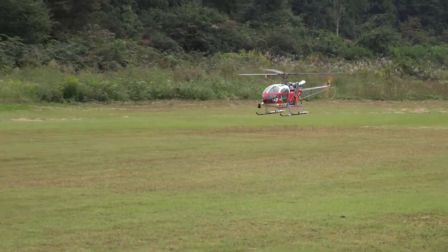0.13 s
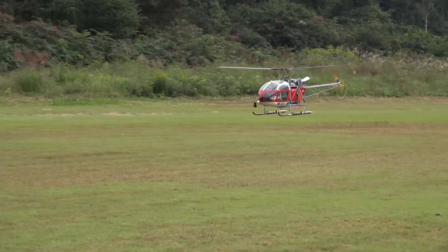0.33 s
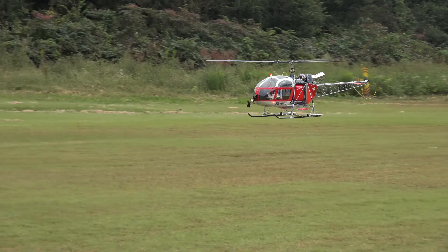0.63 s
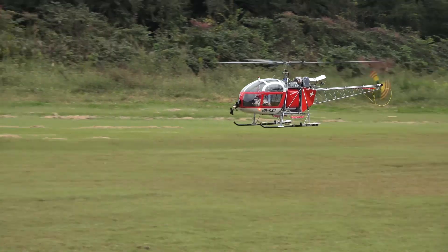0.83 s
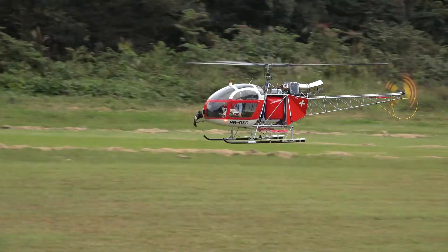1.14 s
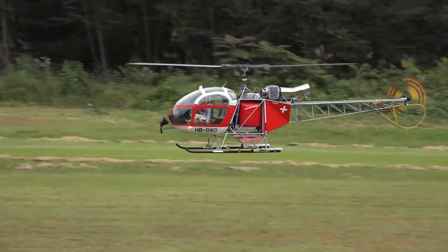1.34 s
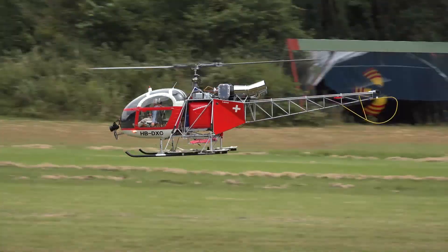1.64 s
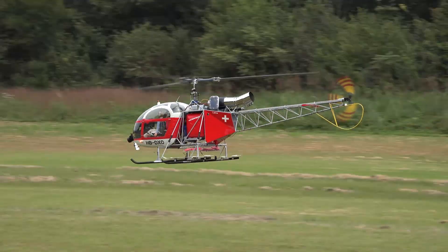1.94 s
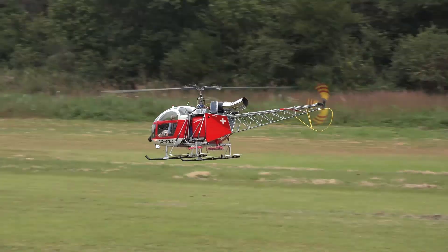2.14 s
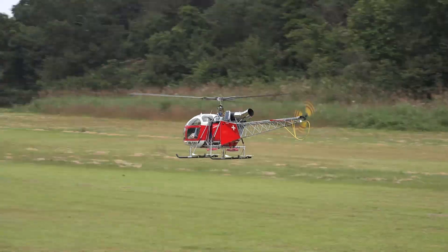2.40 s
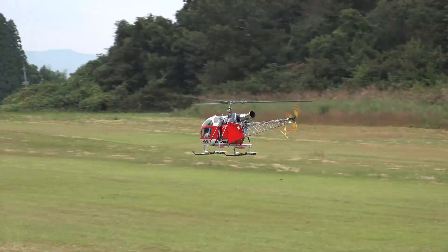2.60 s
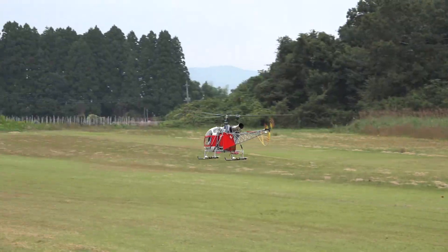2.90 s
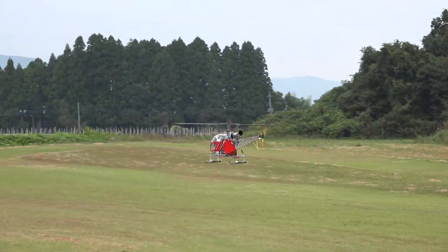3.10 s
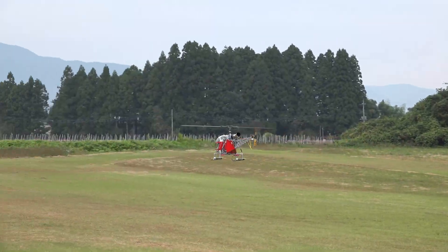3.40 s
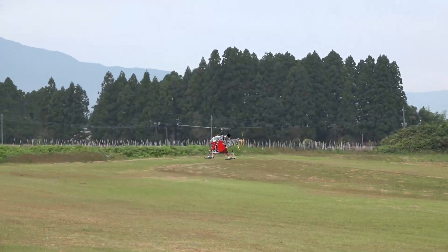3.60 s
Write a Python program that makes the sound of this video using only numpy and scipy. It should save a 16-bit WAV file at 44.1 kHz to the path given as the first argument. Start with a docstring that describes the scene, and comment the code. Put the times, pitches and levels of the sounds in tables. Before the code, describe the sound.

A large model helicopter with a small turbine passes low over an open grass field, shrill whine and hissing jet rush sliding down in pitch, then dulling into roar; outdoor microphone beside the flight path.

```python
"""Over a grass field, a large model helicopter with a small turbine flies low past the microphone.
Compressor whine and rotor, shaft and gear tones are sinusoids that sink in pitch on one Doppler clock.
Shaped noise makes wash, roar, jet rush, hiss and fizz; the treble weakens late, as the wash gains on it.
The grass reflection sweeps a comb through rush and tones, and the blades chop the hiss most when near.
A faint breeze rumbles beneath as low-passed noise."""
import sys
import numpy as np
from scipy import signal
from scipy.io import wavfile
from scipy.ndimage import uniform_filter1d

SR = 44100
rng = np.random.default_rng(int(sys.argv[2]) if len(sys.argv) > 2 else 0)


def put_to_file(sound):
    """Save the sound as 16-bit audio at rate SR, in the file named by the first command-line argument."""
    columns = np.atleast_2d(sound).T  # one column per channel
    safe = np.clip(columns, -1, 1)
    whole_steps = np.round(safe * 32767)
    wavfile.write(sys.argv[1], SR, whole_steps.astype(np.int16))


N = 165375
TIME = np.arange(N) / SR
HOP = 256  # samples between steps of the slow curves


def amp(db):
    """Logarithmic level: decibels to linear amplitude."""
    return 10 ** (np.asarray(db) / 20)


def unit(x):
    """Normalization: scales a signal to rms 1."""
    return x / np.sqrt(np.mean(abs(x) ** 2) + 1e-20)


def curve(table, t, axis=1):
    """Linear interpolation of one column against time."""
    rows = np.array(table)
    return np.interp(t, rows[:, 0], rows[:, axis])


def spectrum(table, hz, axis=1):
    """Interpolation of one column against logarithmic frequency."""
    rows = np.array(table)
    return np.interp(np.log(hz + 1), np.log(rows[:, 0]), rows[:, axis])


def drift(hz):
    """Low-passed complex Gaussian noise of rms 1, its amplitude halved at hz."""
    f = np.fft.fftfreq(N, 1 / SR)
    white = rng.standard_normal(N) + 1j * rng.standard_normal(N)
    return unit(np.fft.ifft(white / (1 + (f / hz) ** 2)))


# closest moment, and how long the sound takes to turn before and after it (s)
ABEAM_S, APPROACH_S, LEAVE_S = 1.73, 1.53, 1.56


def aspect(t):
    """Source directivity: shares of front, side and rear that face the listener, summing to 1."""
    front = np.clip((ABEAM_S - t) / APPROACH_S, 0, 1)
    rear = np.clip((t - ABEAM_S) / LEAVE_S, 0, 1)
    return np.array([front, 1 - front - rear, rear])


# compressor whine as heard, with its Doppler fall: time_s, pitch_hz
WHINE_HZ = [(0, 10274), (.5, 10269), (.8, 10240), (1.02, 10218), (1.25, 10155), (1.49, 10055), (1.72, 9925),
            (1.96, 9778), (2.15, 9695), (2.4, 9615), (2.7, 9555), (3.0, 9526), (3.4, 9492), (3.75, 9460)]
REFERENCE_HZ = 10000  # whine pitch at which the machine's other pitches are stated


def doppler_clock():
    """Doppler effect: source time as heard, advancing one second per REFERENCE_HZ whine cycles."""
    pitch_hz = uniform_filter1d(curve(WHINE_HZ, TIME), size=4000, mode="nearest")
    return np.cumsum(pitch_hz) / REFERENCE_HZ / SR


# lag of the ground reflection behind the direct sound: time_s, lag_ms
GROUND_LAG = [(0, 0.47), (.3, 0.52), (.55, 0.6), (.8, 0.75), (1.3, 1.014), (1.55, 1.22), (1.75, 1.23),
              (1.95, 1.241), (2.15, 1.13), (2.4, 0.924), (2.65, 0.76), (2.95, 0.64), (3.35, 0.58),
              (3.75, 0.51)]
# how the turf reflects: frequency_hz, phase_lag_turns (added, at TURF_LAG_MS), comb_depth (0-1)
TURF = [(201, 0, 1), (457, 0.11, 0.89), (960, 0.081, 0.75), (2270, 0.2, 0.8), (4580, 0.17, 0.65),
        (9000, 0.017, 0.28)]
TURF_LAG_MS = 0.87  # the phase lag grows as the angle gets more grazing
# factor on comb_depth: approaching, abeam, leaving
COMB_BY_ASPECT = [1.09, 1, 0.93]


def ground(hz, t):
    """Two-path interference: gain of the direct sound plus its reflection from soft turf."""
    lag_ms = curve(GROUND_LAG, t)
    path_turns = hz * lag_ms / 1000
    turf_turns = spectrum(TURF, hz) * TURF_LAG_MS / lag_ms
    depth = spectrum(TURF, hz, axis=2) * np.tensordot(COMB_BY_ASPECT, aspect(t), 1)
    return np.sqrt(1 + np.clip(depth, 0, .95) * np.cos(2 * np.pi * (path_turns + turf_turns)))


# spectral shape of the rush before ground and band levels:
# frequency_hz, approaching_db, abeam_db, leaving_db
RUSH = [(20, -24, -47, -15), (70, -31, -23, -26), (109, -17, -18, -14), (170, -18.2, -8.5, -9.5),
        (256, -17.0, -6, -9.5), (356, -15, -10.5, -9.0), (472, -23, -1.5, -12.6), (592, -7.5, -5, -10),
        (790, -9.5, -11.5, -5.0), (1060, -10, -9, -6.5), (1236, -7.5, -2, -3), (1500, -18.2, -8, -11),
        (1980, -16.5, -4.5, -13), (2470, -20, -10.5, -15.5), (3340, -16, -9, -16.5),
        (5000, -14, -7.5, -17.5), (6400, -14.5, -9.5, -16), (8150, -9, -9.5, -16), (8850, -12, -12.5, -17),
        (10900, -12, -13.1, -20.5), (12900, -16.5, -16.5, -20.5), (15500, -23.4, -21.6, -29.5)]
# nominal band levels before trim: time_s, rotor_wash_db, exhaust_roar_db, jet_rush_db, hiss_db, fizz_db
LEVELS = [(0.0, -40, -23, -25, -20.5, -21), (0.13, -34.5, -24.5, -23.5, -20, -23),
          (0.52, -33.5, -22.5, -26, -19, -23.5), (0.65, -32, -21.5, -24, -18.5, -27),
          (0.71, -31, -23, -25.5, -19.5, -25), (0.75, -39, -19, -22, -17.5, -24),
          (0.81, -31, -24.5, -19.5, -19, -20), (0.83, -33, -21.5, -22.5, -17, -21.5),
          (1.12, -32, -20.5, -24, -20.5, -23), (1.14, -30, -20.5, -22, -18, -23.5),
          (1.68, -29.5, -16.5, -20.5, -20, -23.5), (2.05, -32, -17, -18.5, -15.5, -24.5),
          (2.26, -30.5, -20.5, -17.5, -16, -26), (2.32, -28.5, -20.5, -15.5, -17, -25.5),
          (2.5, -29, -18, -18.5, -19, -27.5), (2.91, -26, -17.5, -22.5, -21, -28),
          (2.97, -29, -15.5, -23, -19.5, -27), (3.08, -27, -20.5, -24.5, -22, -31),
          (3.68, -30, -19, -27, -25, -34.5), (3.75, -27, -21, -23, -28, -36)]
# band edges in the order of LEVELS: low_hz, high_hz
BANDS_HZ = [(100, 400), (400, 1600), (1600, 4500), (4500, 9000), (11000, 15500)]
# trim added to each band level: trim_db
BAND_TRIM_DB = [-0.61, -0.57, -0.56, -0.57, -0.077]


def rush_shape(hz, t):
    """Directivity and interference: noise spectrum over time, with each band brought to its level."""
    by_side = np.array([spectrum(RUSH, hz, axis=k + 1) for k in range(3)])
    shape = amp(aspect(t).T @ by_side) * ground(hz, t[:, None])
    gains = []
    for k, (lo, hi) in enumerate(BANDS_HZ):
        power = (shape[:, (hz > lo) & (hz < hi)] ** 2).sum(1)
        gains.append(curve(LEVELS, t, axis=k + 1) + BAND_TRIM_DB[k] - 10 * np.log10(power))
    centers = np.log(BANDS_HZ).mean(1)
    return shape * amp([np.interp(np.log(hz + 1), centers, g) for g in np.array(gains).T])


# stereo spread of the rush: frequency_hz, side_minus_mid_db
WIDTH = [(20, 8), (60, -32), (130, -74), (1000, -85), (2500, -75.5), (5000, -35.5), (9000, -12.5),
         (14000, -21)]
PATCH_DB, SWELL_DB = 1.0, 0.25  # rms unevenness over time and frequency, and over time alone
BLADE_HZ = 43.5  # chop rate at REFERENCE_HZ
CHOP_NEAR, CHOP_FAR = 0.28, .06  # depth added near the pass, and depth always present
CHOP_S, CHOP_WIDTH_S, CHOP_ABOVE_HZ = 1.6, 0.63, 9900


def rush(clock):
    """Turbulence noise with amplitude modulation: combed by the ground, treble chopped by the blades."""
    hz = np.fft.rfftfreq(1024, 1 / SR)
    t = np.arange(N // HOP + 5) * HOP / SR
    shape = rush_shape(hz, t)
    patches = uniform_filter1d(rng.standard_normal(shape.shape), size=12, axis=0)
    patches = unit(uniform_filter1d(patches, size=16, axis=1))
    swell = unit(uniform_filter1d(rng.standard_normal(len(t)), size=8))[:, None]
    mid_side = (2,) + shape.shape
    noise = rng.standard_normal(mid_side) + 1j * rng.standard_normal(mid_side)
    noise = noise * shape * amp(PATCH_DB * patches + SWELL_DB * swell)
    noise = noise * np.array([np.ones(len(hz)), amp(spectrum(WIDTH, hz))])[:, None]

    def sound(part):
        """Fourier synthesis: overlap-adds the noise frames."""
        wave = signal.istft(part, nperseg=1024, noverlap=768, time_axis=1, freq_axis=2)[1]
        return wave[:, :N] * np.sqrt(1.5)

    treble = 1 - 1 / (1 + (hz / CHOP_ABOVE_HZ) ** 4)
    low, high = sound(noise * (1 - treble)), sound(noise * treble)
    depth = CHOP_FAR + CHOP_NEAR * np.exp(-((TIME - CHOP_S) / CHOP_WIDTH_S) ** 2)
    return low + high * (1 + depth * np.cos(2 * np.pi * BLADE_HZ * clock))


# whine fading in and out on its way: time_s, level_db (before WHINE_GAIN_DB)
WHINE_DB = [(0, -11), (.55, -12), (.58, -15), (.87, -15.5), (1.11, -11), (1.19, -17), (1.24, -13),
            (1.35, -15.5), (1.38, -17), (1.43, -13.5), (1.67, -19), (1.71, -14.5), (1.97, -21.5),
            (2.02, -29), (2.06, -19), (2.125, -29), (2.17, -18), (2.36, -24), (2.42, -16.5), (2.49, -16),
            (2.6, -21.5), (2.74, -19.5), (2.8, -26.5), (2.88, -15.5), (2.96, -17.5), (3.21, -34),
            (3.27, -27), (3.39, -25), (3.46, -34), (3.52, -28.5), (3.63, -24), (3.75, -27.5)]
WHINE_GAIN_DB, WHINE_SIDE_DB = -1, -21  # overall gain; side relative to mid
FLUTTER_EARLY, FLUTTER_LATE, FLUTTER_HZ = 0.1, 0.18, 22  # rms share of the tone, and noise cutoff
SKIRT_DB, SKIRT_HZ = -15, 160  # fuzz round the whine, relative to the tone


def whine(clock):
    """Blade-passing tone with random modulation, fluttering more as it crosses the rotor wake."""
    front = aspect(TIME)[0]
    flutter = FLUTTER_EARLY * front + FLUTTER_LATE * (1 - front)
    modulation = 1 + flutter * drift(FLUTTER_HZ) + amp(SKIRT_DB) * drift(SKIRT_HZ)
    tone = modulation * np.exp(2j * np.pi * REFERENCE_HZ * clock)
    tone = np.sqrt(2) * tone * amp(curve(WHINE_DB, TIME) + WHINE_GAIN_DB)
    return np.array([tone.real, amp(WHINE_SIDE_DB) * tone.imag])  # mid, side


TONE_WAVER, ROTOR_WAVER, TONE_WAVER_HZ = 0.52, .15, 7.1  # rms shares of a tone, and noise cutoff


def tones(table, waver, clock):
    """Additive synthesis: wavering sinusoids, each rising and falling in the ground comb."""
    out, facing, t = np.zeros(N), aspect(TIME).T, TIME[::HOP]
    for hz, *db in table:
        heard_hz = hz * curve(WHINE_HZ, t) / REFERENCE_HZ
        comb = np.interp(TIME, t, unit(ground(heard_hz, t)))
        tone = unit(1 + waver * drift(TONE_WAVER_HZ)) * np.exp(2j * np.pi * hz * clock)
        out += np.sqrt(2) * amp(facing @ np.array(db)) * comb * tone.real
    return out


# rotor tones at REFERENCE_HZ, before the comb: pitch_hz, approaching_db, abeam_db, leaving_db
ROTOR_TONES = [(43.5, -51, -47, -54), (59.5, -56, -47, -51), (87, -50, -46, -44), (181, -38, -37, -40)]


def rotor_tones(clock):
    """Periodic blade loading: low tones of the rotors, with slight waver."""
    return tones(ROTOR_TONES, ROTOR_WAVER, clock)


# turbine shaft tones at REFERENCE_HZ, before the comb: pitch_hz, approaching_db, abeam_db, leaving_db
SHAFT_TONES = [(1651, -40.5, -35.5, -50), (3350, -38, -31.5, -40.5), (5030, -36.5, -36, -40),
               (6710, -31.5, -33, -47), (8470, -35, -38, -46), (11666, -47, -45, -56),
               (13333, -47, -50, -54)]


def shaft_tones(clock):
    """Rotational periodicity: a spaced series of tones from the turbine shaft."""
    return tones(SHAFT_TONES, TONE_WAVER, clock)


# gear tones at REFERENCE_HZ, before the comb: pitch_hz, approaching_db, abeam_db, leaving_db
GEAR_TONES = [(1013, -49.5, -25.5, -39), (3580, -44, -32, -48), (5800, -49, -47, -51),
              (6420, -41, -31, -40), (7821, -42, -33, -45), (8400, -40, -44, -37), (12300, -58, -54, -47)]


def gear_tones(clock):
    """Tooth meshing: tones of the gears, tied to the turning of the machine."""
    return tones(GEAR_TONES, TONE_WAVER, clock)


WIND_DB, WIND_HZ = -50, 30  # breeze on the microphone: rms level and noise cutoff


def breeze():
    """Partial correlation: faint wind rumble, partly different in the two channels."""
    common = drift(WIND_HZ).real
    return amp(WIND_DB) * unit(np.array([common + .5 * drift(WIND_HZ).real for channel in range(2)]))


WASH_CUT_HZ = 98  # the rotor wash holds little below this
RIGHT_DB = .2  # gain of the right channel before the breeze


def scene():
    """Superposition: every rotating part runs on one Doppler-shifted clock, summed in mid and side."""
    clock = doppler_clock()
    cut = signal.butter(4, WASH_CUT_HZ, "highpass", fs=SR, output="sos")
    mid, side = signal.sosfilt(cut, rush(clock)) + whine(clock)
    mid = mid + rotor_tones(clock) + shaft_tones(clock) + gear_tones(clock)
    return np.array([mid + side, (mid - side) * amp(RIGHT_DB)]) + breeze()


EDGE_HZ = 15750  # upper band limit


def record(dry):
    """Band limiting: a linear-phase low-pass filter at the recorder's upper edge."""
    lowpass = signal.firwin(511, EDGE_HZ, window=("kaiser", 9), fs=SR)
    return signal.oaconvolve(dry, lowpass[None], "same", axes=1)


dry = scene()
out = record(dry)
put_to_file(out)
```